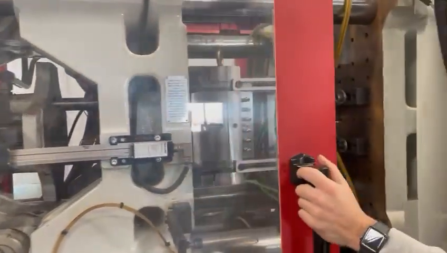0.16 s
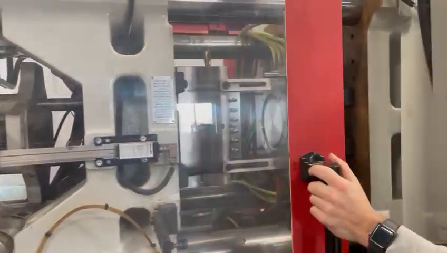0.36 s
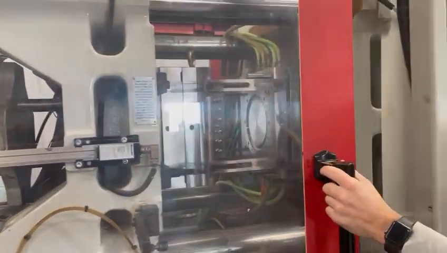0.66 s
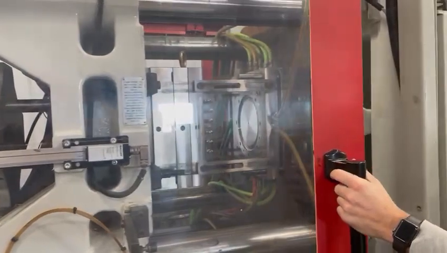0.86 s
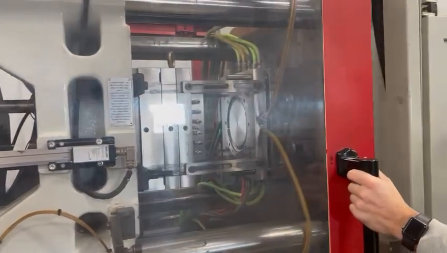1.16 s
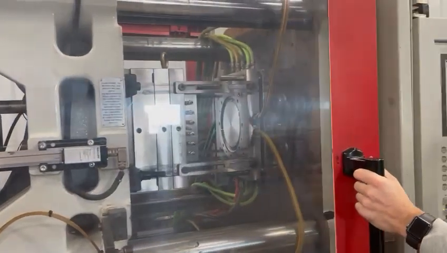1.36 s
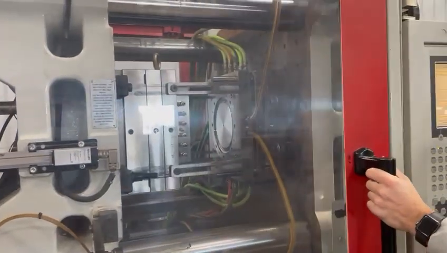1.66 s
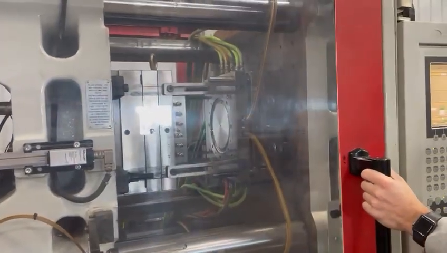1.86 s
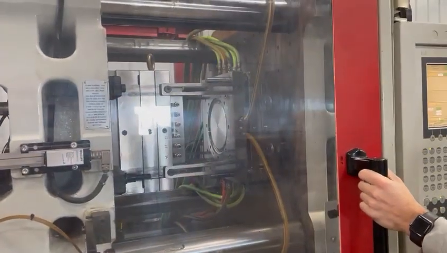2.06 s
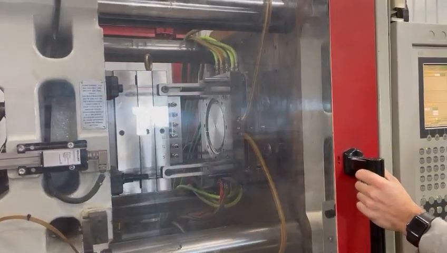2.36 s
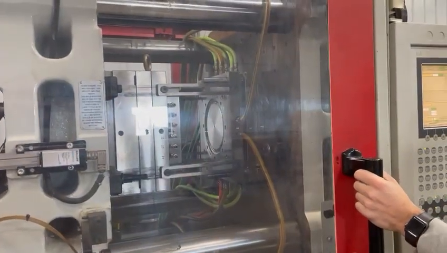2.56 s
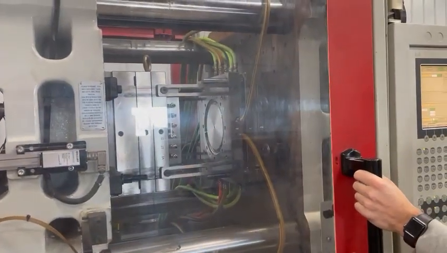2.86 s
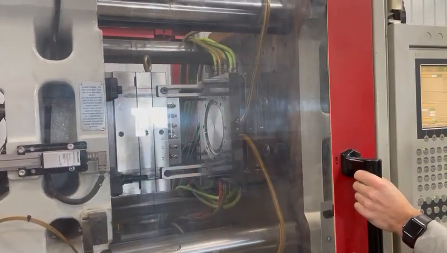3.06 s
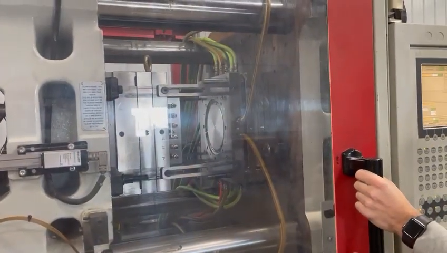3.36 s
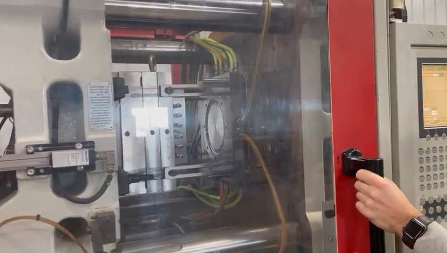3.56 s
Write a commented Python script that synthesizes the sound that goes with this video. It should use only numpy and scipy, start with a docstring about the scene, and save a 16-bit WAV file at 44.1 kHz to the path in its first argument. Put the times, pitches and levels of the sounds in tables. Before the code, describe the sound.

Close to the microphone, a machine's guard door rolls and bangs home with a bright metallic clatter echoing in the hall. Motors and pump hum throughout; a short air hiss and dull thuds come last.

```python
"""A sliding safety door rolls shut on an injection moulding machine, at arm's length from the microphone.
Rollers rumble, the guide scrapes, the latch ticks, and the door clacks home: noise cracks over ringing modes.
Later a valve hisses in puffs of resonant noise, and the machine thuds with low modes and dull noise.
Wavering tones of motors and pump hum throughout, over the steady shaped noise of a factory hall."""
import sys
import numpy as np
from scipy import signal
from scipy.fft import rfft, irfft, next_fast_len
from scipy.io import wavfile
from scipy.ndimage import uniform_filter1d

SR = 44100
rng = np.random.default_rng(int(sys.argv[2]) if len(sys.argv) > 2 else 0)


def inscribe(sig):
    """Save sig as 16-bit PCM at rate SR to the path in sys.argv[1].

    A 1-D sig is mono; a 2-D sig holds one channel per row.
    Samples are clipped to [-1, 1] before scaling.
    """
    pcm = np.round(np.clip(np.atleast_2d(sig).T, -1, 1) * 32767)
    wavfile.write(sys.argv[1], SR, pcm.astype(np.int16))


N = 163170
T = np.arange(N) / SR
FFT_SIZE = next_fast_len(2 * N, True)


def amp(db):
    """Decibels to gain."""
    return 10 ** (np.asarray(db) / 20)


def level(curve):
    """Gain over time from (time_s, level_db) points."""
    return amp(np.interp(T, *np.array(curve).T))


def along(points, hz):
    """Read (frequency_hz, value) points on a log-frequency axis."""
    f, v = np.array(sorted(points), float).T
    return np.interp(np.log(np.maximum(hz, 1)), np.log(f), v)


def shape(x, gain):
    """Filter by a gain that is a function of frequency."""
    spectrum = rfft(x, FFT_SIZE)
    hz = np.arange(spectrum.shape[-1]) * SR / FFT_SIZE
    return irfft(spectrum * gain(hz), FFT_SIZE)[..., :N]


# likeness of left and right in diffuse sound: frequency_hz, correlation
LIKENESS = [(25, 0.99), (55, 1), (150, 1), (300, .78), (600, 0.17), (1200, 0.054), (2200, 0.2),
            (4000, 0.67), (10000, 0.06)]


def diffuse():
    """Stereo noise at 0 dB per Hz, alike left and right in the bass."""
    like = lambda f: np.clip(along(LIKENESS, f), -1, 1)
    mid = shape(rng.standard_normal(N), lambda f: np.sqrt(1 + like(f)))
    side = shape(rng.standard_normal(N), lambda f: np.sqrt(1 - like(f)))
    return np.array([mid + side, mid - side]) * np.sqrt(SR) / 2


def noise(points, tilt_db=0):
    """Stereo noise with a spectrum, tilted about 2 kHz by dB per octave; the tilt stops below 500 Hz."""
    def gain(f):
        octaves = np.log2(np.maximum(f, 500) / 2000)
        return amp(along(points, f) + tilt_db * octaves)
    return shape(diffuse(), gain)


def resonant(peaks):
    """Stereo noise in resonances of (frequency_hz, width_hz, density_db_per_hz)."""
    def gain(f):
        return sum(amp(db) / (1 + (2 * (f - hz) / width) ** 2) for hz, width, db in peaks)
    return shape(diffuse(), gain)


def walk(rate):
    """Slow random wander with unit spread: smoothed random steps, rate of them a second."""
    k = int(SR / rate)
    steps = np.repeat(rng.standard_normal(N)[:N // k + 1], k)[:N]
    w = uniform_filter1d(uniform_filter1d(steps, k), k)
    return w / w.std()


def fade(start, t60, rise):
    """Envelope of a blow: quick rise, exponential decay by 60 dB in t60 seconds."""
    age = np.maximum(T - start, 0)
    return (1 - np.exp(-age / rise)) * np.exp(-np.log(1000) * age / t60)


MODE_SPREAD_RAD = 1.0  # largest phase shift of a mode, opposite in the two channels


def ring(start, modes):
    """Struck modes as decaying sines, up to 1 s long; high ones reach the channels out of step."""
    out, i = np.zeros((2, N)), int(start * SR)
    age = T[:min(N - i, SR)]
    for (hz, db, t60), lag in zip(modes, rng.uniform(-1, 1, len(modes))):
        turn = np.array([[1], [-1]]) * lag * min(hz / 1000, 1) * MODE_SPREAD_RAD
        decay = amp(db) * np.exp(-np.log(1000) * age / t60)
        out[:, i:i + len(age)] += decay * np.sin(2 * np.pi * hz * age + turn)
    return out


SCATTER_DB = 5.5  # spread of a blow's force among the modes
DETUNE = .004  # spread of the modes' pitch from hit to hit, as the contact shifts (share)


def struck(hits, modes):
    """Each hit rings the metal with its own brightness, and a little differently in every mode."""
    out = 0
    chances = rng.standard_normal((len(hits), len(modes), 2))
    for (start, ring_db, _, tilt), chance in zip(hits, chances):
        voiced = []
        for (hz, db, t60), (extra, shift) in zip(modes, chance):
            mode_db = db + SCATTER_DB * extra + tilt * np.log2(hz / 2000)
            voiced.append((hz * (1 + DETUNE * shift), mode_db, t60))
        out = out + amp(ring_db) * ring(start, voiced)
    return out


def pan(x, right_db):
    """Lean a sound to the right by a level difference between the channels."""
    return x * amp(np.array([[-1], [1]]) * right_db / 2)


# decay of the hall by band: frequency_hz, t60_s (a negative t60 makes the band grow)
HALL_T60 = [(150, -2.07), (1000, 1.7), (2500, 1.4), (5000, 0.74), (10000, .5)]
# how strongly the hall answers: frequency_hz, level_db
ECHO = [(100, -1), (600, 2), (1400, -7), (2500, -8.5), (5000, -8), (10000, -19)]
ECHO_RISE_S = 0.0025


def in_hall(x, wet_db):
    """Add the hall's noise tail: it dies sooner in the treble, while its lowest band swells."""
    white, tail = diffuse() * np.sqrt(2 / SR), 0
    for k, (_, t60) in enumerate(HALL_T60):
        band = [(hz, float(j == k)) for j, (hz, _) in enumerate(HALL_T60)]
        env = fade(0, t60, ECHO_RISE_S)
        colour = shape(white, lambda f: along(band, f) * amp(along(ECHO, f)))
        tail = tail + colour * env / np.linalg.norm(env)
    return x + amp(wet_db) * signal.fftconvolve(x, tail, axes=1)[:, :N]


# tones of the motors, before the level curve: pitch_hz, level_db, waver_share, right_lead_rad
HUM = [(53.7, -32, .05, 0), (119.6, -49, .6, .2), (236.9, -47, .6, .3), (399.3, -44, .3, .4),
       (707.6, -52, .4, 1.2), (760, -48.5, .5, 1.6), (1874, -52, .5, .9), (2637, -61, .6, .3)]
# harmonics of the pump, from the first up: level_db, waver_share, right_lead_rad
PUMP = [(-41, 0.22, 0.5), (-44.5, 1, 1.73), (-55.5, 0.97, 2.3), (-60, 1, 0.4), (-55, 1, 1.2),
        (-62, 0.69, 0.33), (-62, 1, 0.37)]
# the hum over time, with a brief dip as the door comes home: time_s, level_db
HUM_LEVEL = [(0, -2.5), (.5, -2.5), (.8, -0.5), (1.3, -1.5), (1.7, -2.5), (1.82, -7), (1.95, 1), (2.6, -1),
             (3.1, -0.5), (3.7, -3)]
PUMP_HZ, WAVER_PER_S = 373.0, 7.28
HUM_RIGHT_DB = 6  # full lean, reached from the pump's first harmonic up


def hum():
    """Motor tones and pump harmonics, each wavering in level and phase; the deepest is nearly centred."""
    out = 0
    harmonics = [((k + 1) * PUMP_HZ, *row) for k, row in enumerate(PUMP)]
    for hz, db, waver, lead in HUM + harmonics:
        wander = (walk(WAVER_PER_S) + 1j * walk(WAVER_PER_S)) / np.sqrt(2)
        sway = (1 + waver * wander) / np.hypot(1, waver)
        phase_lead = np.exp(1j * np.array([[0], [lead]]))
        tone = (sway * np.exp(2j * np.pi * hz * T) * phase_lead).real
        lean_db = HUM_RIGHT_DB * min(hz / PUMP_HZ, 1) ** 2
        out = out + pan(np.sqrt(2) * amp(db) * tone, lean_db)
    return out * level(HUM_LEVEL)


# steady noise of the hall: frequency_hz, density_db_per_hz
HALL = [(20, -69.5), (36, -66), (70, -65.5), (130, -63.5), (180, -69.5), (250, -62), (340, -65.5),
        (490, -71), (700, -71.5), (1000, -76.5), (1500, -75), (2100, -77.5), (2700, -81.5), (3300, -88),
        (5000, -92), (6500, -99.5), (10000, -108), (12000, -111)]
# hissing whine of the pump: frequency_hz, density_db_per_hz
WHINE = [(1700, -110), (1820, -82), (1872, -61.5), (1930, -84.5), (2050, -110)]
HALL_RIGHT_DB = 1


def hall():
    """Steady factory noise and the pump's narrow whine, both slightly restless; the bass is centred."""
    air = noise(HALL) * amp(.5 * walk(6.74)) + noise(WHINE) * amp(walk(1.2))
    bass = shape(air, lambda f: 1 / (1 + (f / 280) ** 2) ** 2)
    return bass + pan(air - bass, HALL_RIGHT_DB)


# rumble of the door's rollers, before its level curve: frequency_hz, density_db_per_hz
ROLL = [(40, -82), (130, -66), (210, -60.5), (320, -78), (600, -70.5), (1200, -78.5), (2500, -85.5),
        (4000, -96.5), (9000, -115)]
# the rumble over time: time_s, level_db
ROLL_LEVEL = [(0, 0), (.3, 1.5), (.8, -2.5), (1.1, -6), (1.4, -7.5), (1.7, 3.5), (1.9, -63)]
# the door brushing along its guide, before its level curve: frequency_hz, density_db_per_hz
BRUSH = [(400, -75), (1200, -73), (1900, -72.5), (3000, -78.5), (4000, -82.5), (6500, -89.5), (10000, -100),
         (12000, -103)]
# the brushing over time: time_s, level_db
BRUSH_LEVEL = [(.3, -40), (.37, -4.5), (.42, -5), (.48, 1.5), (.55, -3.5), (.68, -9.5), (.95, -29)]
# resonances of the dry guide as the door gathers speed: frequency_hz, width_hz, density_db_per_hz
RUB = [(1800, 130, -66.5), (1900, 100, -66), (2010, 100, -66)]
# the dry rub over time: time_s, level_db
RUB_LEVEL = [(.33, -40), (.345, 1), (.385, 0), (.4, -2), (.43, 4.5), (.475, -4), (.55, -11), (.7, -30)]
SCRAPE_RIGHT_DB = 1


def slide():
    """Uneven roller rumble ebbs, then swells before it stops; the guide gives a short resonant scrape."""
    rollers = noise(ROLL) * level(ROLL_LEVEL) * amp(3.6 * walk(14.1))
    scrape = noise(BRUSH) * level(BRUSH_LEVEL) + resonant(RUB) * level(RUB_LEVEL)
    return rollers + pan(scrape * amp(0.56 * walk(55)), SCRAPE_RIGHT_DB)


# ticks of the latch: start_s, level_db
TICKS = [(1.4725, -1), (1.481, -18), (1.503, -19), (1.532, -23)]
# modes of the latch, before each tick's level: pitch_hz, level_db, t60_s
LATCH_MODES = [(2164, -23.5, 0.12), (2340, -26, 0.03), (3010, -31.5, 0.16), (4300, -31, 0.054),
               (5300, -27, 0.0403), (7360, -38, 0.0355)]
# crack of the latch, before each tick's level: frequency_hz, density_db_per_hz
LATCH_CRACK = [(300, -86), (1600, -72), (2200, -48), (3200, -61), (5500, -58), (7000, -50.5), (8700, -22),
               (9800, -65.5), (12000, -59)]
LATCH_T60_S, LATCH_RISE_S = 0.063, 0.00055


def latch():
    """Small bright ticks, modes under a noise crack, as the latch touches and rides over its catch."""
    out = 0
    for start, db in TICKS:
        crack = noise(LATCH_CRACK) * fade(start, LATCH_T60_S, LATCH_RISE_S)
        out = out + amp(db) * (ring(start, LATCH_MODES) + crack)
    return out


# the latch dropping into its catch: start_s, ring_db, crack_db, treble_tilt_db_per_octave
KNOCKS = [(1.562, -4.5, -5, 0), (1.573, -6, -11.5, -1.5), (1.581, -9, -14.5, 1), (1.591, 3.5, -20.5, -4.5),
          (1.609, -1.5, -27, -3.5)]
# blows of the door on its stop: start_s, ring_db, crack_db, treble_tilt_db_per_octave
BLOWS = [(1.668, -31, -15.5, -0.5), (1.6831, 1, -4, 4), (1.688, -8, -7.5, -4), (1.697, -4.5, -14, -8.5),
         (1.716, -12, -20, -7), (1.741, -22, -22.5, -4.5), (1.868, -37, -19, -5)]
# crack of a hit, before its level and tilt: frequency_hz, density_db_per_hz
DOOR_CRACK = [(100, -67), (400, -53.5), (900, -46.5), (1350, -43), (1850, -59.5), (2300, -37),
              (2550, -46.5), (2850, -48), (3400, -48.5), (4800, -54.5), (6600, -52.5), (7500, -32),
              (9300, -49), (10200, -55), (12000, -63)]
# rattle of the door's panel, which builds more slowly: frequency_hz, density_db_per_hz
PANEL = [(200, -72), (600, -65), (1000, -70), (1380, -43), (1850, -55.5), (2500, -59.5), (3200, -61.5),
         (5000, -71.5), (8600, -79.5), (9300, -71.5), (10000, -90.5)]
CRACK_T60_S, CRACK_RISE_S = 0.064, 0.0011
PANEL_T60_S, PANEL_RISE_S = 0.25, 0.0099
RATTLE_PER_S, RATTLE_DB = 160, 1.5


def door_clatter():
    """Every knock and blow cracks; the blows also shake the panel, the loudest driving the door home."""
    cracks, shaking_power = 0, 0
    for start, _, db, tilt in KNOCKS + BLOWS:
        cracks = cracks + amp(db) * noise(DOOR_CRACK, tilt) * fade(start, CRACK_T60_S, CRACK_RISE_S)
    for start, _, db, _ in BLOWS:
        shaking_power = shaking_power + (amp(db) * fade(start, PANEL_T60_S, PANEL_RISE_S)) ** 2
    rattle = amp(RATTLE_DB * walk(RATTLE_PER_S))
    return cracks + noise(PANEL) * np.sqrt(shaking_power) * rattle


# modes of the catch, before each knock's level, tilt and scatter: pitch_hz, level_db, t60_s
CATCH_MODES = [(1497, -33, .16), (1580, -39, .09), (1760, -39, .1), (2005, -38, .08), (2148, -30, .09),
               (2309, -35, .09), (2500, -34, .09), (2724, -31, .1), (3235, -41, .06), (4172, -44, .06),
               (4409, -42, .08), (9400, -33, .14), (9523, -36, .12)]
# modes of the door, before each blow's level, tilt and scatter: pitch_hz, level_db, t60_s
DOOR_MODES = [(596, -46, .16), (958, -40, .12), (1222, -38, .13), (1289, -33, .17), (1355, -29, .16),
              (1429, -29, .16), (1492, -33, .18), (2247, -29, .12), (2440, -21, .055), (2480, -26, .11),
              (2540, -18, .04), (2624, -19, .055), (2700, -22, .045), (2780, -25, .05), (3230, -35, .1),
              (3390, -35, .09), (4050, -34, .06), (6723, -32, .07), (9200, -28, .13), (9330, -25, .2),
              (9411, -28, .17)]


def door_ring():
    """The knocks ring the metal of the catch, the blows that of the door."""
    return struck(KNOCKS, CATCH_MODES) + struck(BLOWS, DOOR_MODES)


# how far the door's sound leans to the right: frequency_hz, right_db
DOOR_LEAN = [(350, -1), (700, 1.5), (2000, 3.5), (3700, 2.5), (7000, 0.5)]


def at_door(x):
    """The door's stop lies to the right, heard most in the upper mids; the lows lean slightly left."""
    return shape(x, lambda f: pan(0.89, along(DOOR_LEAN, f)))


# dull bumps as the door settles: start_s, level_db, t60_s
BUMPS = [(1.735, -0.5, 0.6), (1.762, 10.5, 0.097), (1.898, -5, 0.78)]
# colour of a bump, before its level: frequency_hz, density_db_per_hz
BUMP = [(50, -75.5), (95, -55.5), (150, -44), (200, -63), (300, -55), (450, -85), (1000, -68), (3000, -100)]
THUD_RISE_S = .008  # shared by bumps and thuds


def settle():
    """The heavy door bumps softly against its stop: low noise with a slow onset."""
    return sum(amp(db) * noise(BUMP) * fade(start, t60, THUD_RISE_S) for start, db, t60 in BUMPS)


# puffs of the valve: start_s, rise_s, hold_s, t60_s, level_db, outlet_whistle_db
PUFFS = [(3.202, .018, .012, .1, -13, -20), (3.226, .016, .035, .2, -5.5, -20),
         (3.279, .018, .038, .36, 1, -3), (3.35, .014, .03, .26, -9, 6)]
# hiss of the jet, before the puffs' level: frequency_hz, density_db_per_hz
JET = [(200, -75), (600, -64.5), (1000, -64), (1450, -59.5), (2200, -64), (2700, -65.5), (3500, -63),
       (5000, -69.5), (6700, -65), (9000, -80), (10200, -84), (11200, -93), (12000, -117)]
# resonances of the outlet, before the puffs' level: frequency_hz, width_hz, density_db_per_hz
OUTLET = [(900, 150, -60), (1170, 70, -53), (1490, 22, -52), (1785, 90, -45.5), (1990, 130, -53),
          (10160, 300, -65)]
# whistle of the outlet, before the puffs' level: frequency_hz, width_hz, density_db_per_hz
WHISTLE = [(3730, 170, -57.5), (3960, 83, -55.5), (4020, 60, -57)]
# thin top whistle as the jet opens, before its level curve: frequency_hz, width_hz, density_db_per_hz
SING = [(11180, 100, -60)]
# the top whistle over time: time_s, level_db
SING_LEVEL = [(3.19, -90), (3.21, -3), (3.245, -8), (3.29, -8), (3.33, -34), (3.6, -29.5)]
SPUTTER_PER_S, SPUTTER_DB = 600, 1.8  # quick grain of the jet
SURGE_PER_S, SURGE_DB = 90, .7  # slower surges of jet and whistles


def valve():
    """A fluttering jet vents in overlapping puffs through a resonant outlet, which whistles late."""
    jet_power, whistle_power = 0, 0
    for start, rise, hold, t60, db, whistle_db in PUFFS:
        opening = np.clip((T - start) / rise, 0, 1)
        closing = np.exp(-np.log(1000) * np.maximum(T - start - rise - hold, 0) / t60)
        flow = amp(db) * opening * closing
        jet_power = jet_power + flow ** 2
        whistle_power = whistle_power + (flow * amp(whistle_db)) ** 2
    sputter = amp(SPUTTER_DB * walk(SPUTTER_PER_S))
    jet = (noise(JET) + resonant(OUTLET)) * np.sqrt(jet_power) * sputter
    whistles = resonant(WHISTLE) * np.sqrt(whistle_power) + resonant(SING) * level(SING_LEVEL)
    return (jet + whistles) * amp(SURGE_DB * walk(SURGE_PER_S))


# thuds of the machine: start_s, level_db, t60_s (of the noise)
THUDS = [(3.223, -9.5, 0.33), (3.439, -14, 0.31), (3.477, 2, 0.17), (3.494, -4.5, 0.21), (3.518, -7, 0.36),
         (3.572, -3, 0.09), (3.606, -8.5, 0.19)]
# dull knock of a thud, before its level: frequency_hz, density_db_per_hz
KNOCK = [(40, -73), (110, -48.5), (200, -46.5), (380, -50), (600, -61), (1500, -63), (3000, -70),
         (8000, -110)]
# resonances of the frame, before each thud's level: frequency_hz, width_hz, density_db_per_hz
FRAME = [(120, 60, -52), (215, 40, -55), (295, 70, -54)]
# modes of the frame, before each thud's level: pitch_hz, level_db, t60_s
FRAME_MODES = [(94, -27, .3), (124, -23, .25), (216, -32, .25), (276, -34, .28), (428, -40, .2)]


def frame():
    """Heavy soft blows set the machine's frame booming: low modes with resonant and dull noise."""
    out = 0
    for start, db, t60 in THUDS:
        boom = (resonant(FRAME) + noise(KNOCK)) * fade(start, t60, THUD_RISE_S)
        out = out + amp(db) * (ring(start, FRAME_MODES) + boom)
    return out


# share of the hall in each sound
DOOR_WET_DB, RING_WET_DB, THUD_WET_DB, VALVE_WET_DB = 2.5, -4, -12, 1
VALVE_RIGHT_DB = 1


def scene():
    """Door, valve and thuds sound in the hall, over the running machine."""
    clatter = in_hall(latch() + at_door(door_clatter()), DOOR_WET_DB)
    ringing = in_hall(at_door(door_ring()), RING_WET_DB)
    thuds = in_hall(settle() + frame(), THUD_WET_DB)
    venting = pan(in_hall(valve(), VALVE_WET_DB), VALVE_RIGHT_DB)
    return hum() + hall() + slide() + clatter + ringing + thuds + venting


NOTCH_HZ, NOTCH_WIDTH_HZ, NOTCH_DB = 8026, 1096, -33.5
CEILING, TOP_HZ = .93, 11800


def record(dry):
    """The microphone has a notch in the treble; the highest peaks are rounded and the top is cut steeply."""
    # the fourth power gives the notch a flat floor
    notch = lambda f: amp(NOTCH_DB * np.exp(-((f - NOTCH_HZ) / NOTCH_WIDTH_HZ) ** 4))
    coloured = shape(dry, notch)
    rounded = coloured / (1 + (coloured / CEILING) ** 6) ** (1 / 6)
    top_cut = signal.ellip(10, .2, 80, TOP_HZ, fs=SR, output="sos")
    return signal.sosfilt(top_cut, rounded)


dry = scene()
out = record(dry)
inscribe(out)
```